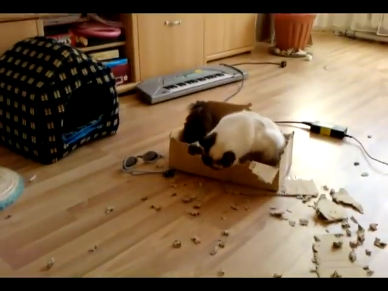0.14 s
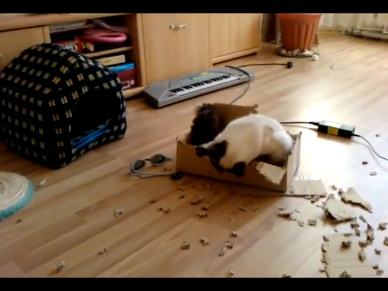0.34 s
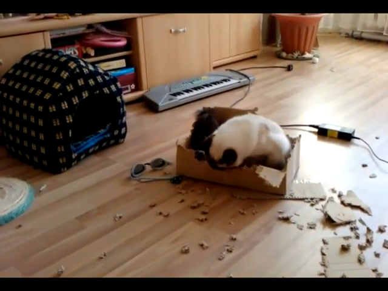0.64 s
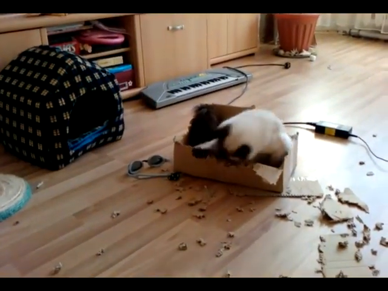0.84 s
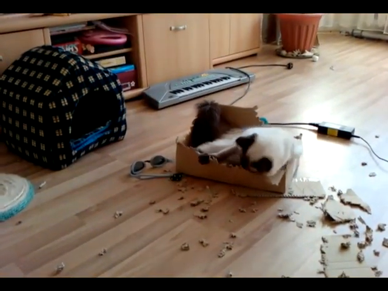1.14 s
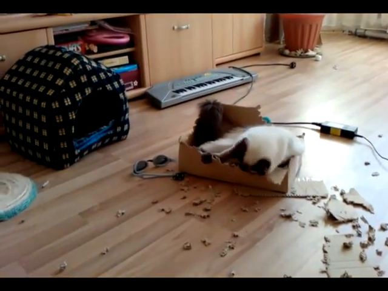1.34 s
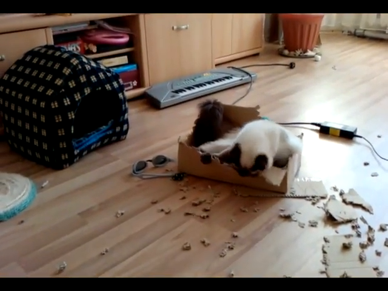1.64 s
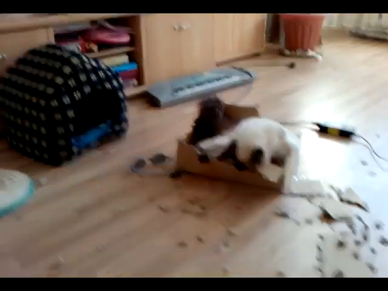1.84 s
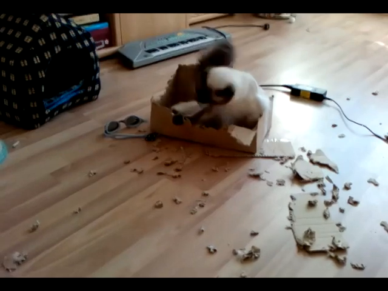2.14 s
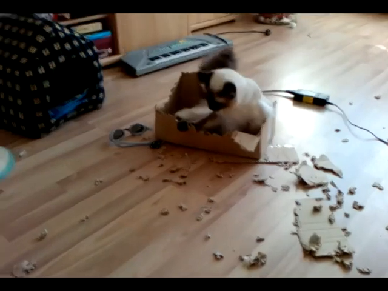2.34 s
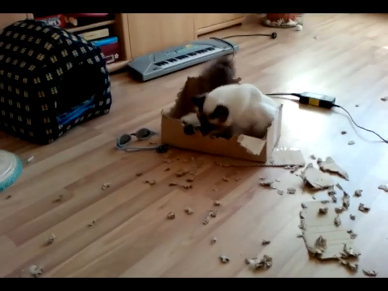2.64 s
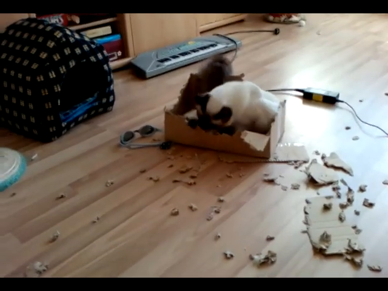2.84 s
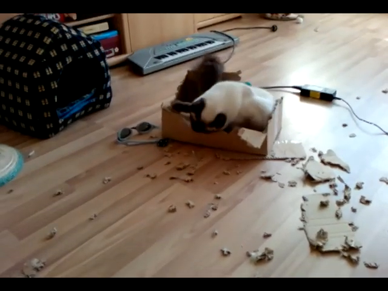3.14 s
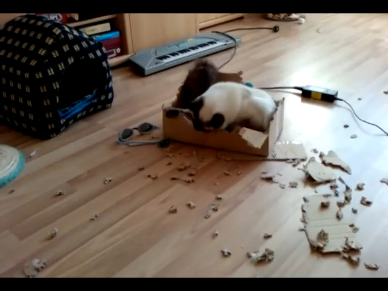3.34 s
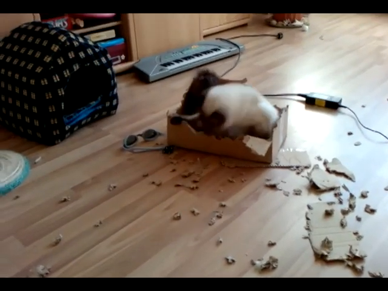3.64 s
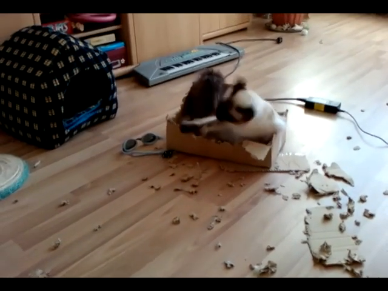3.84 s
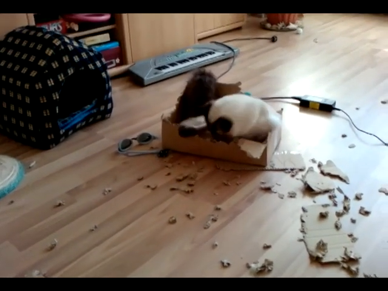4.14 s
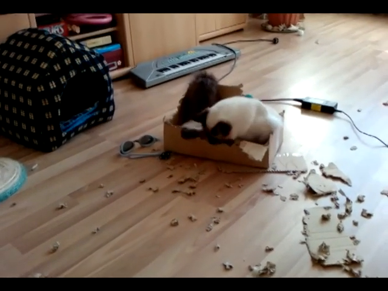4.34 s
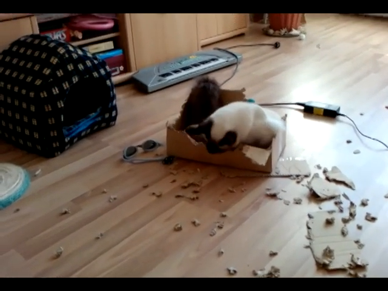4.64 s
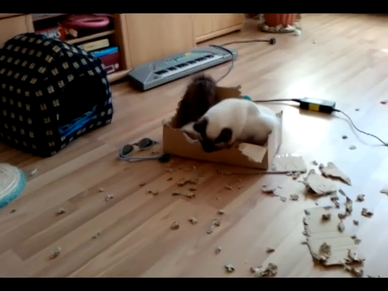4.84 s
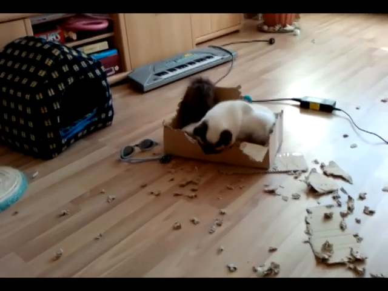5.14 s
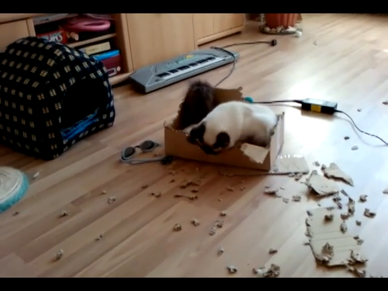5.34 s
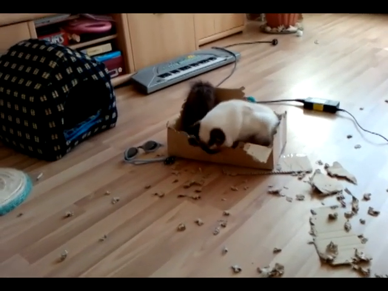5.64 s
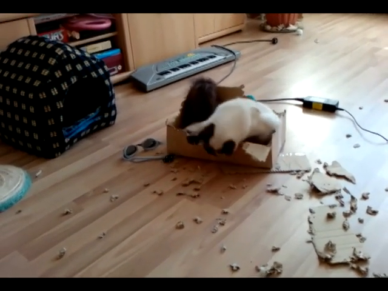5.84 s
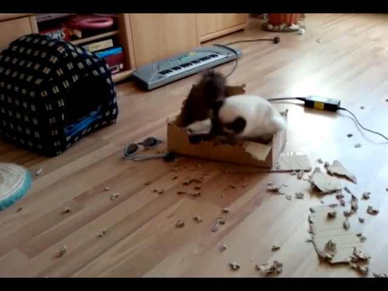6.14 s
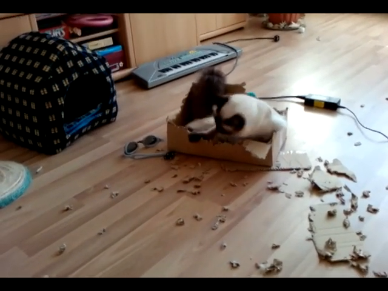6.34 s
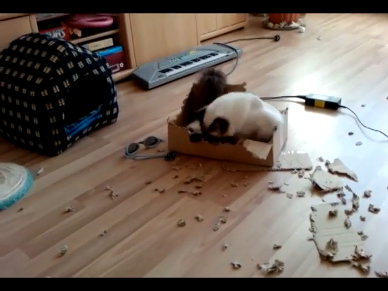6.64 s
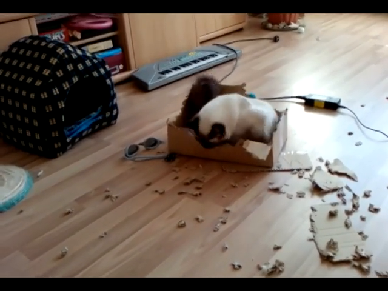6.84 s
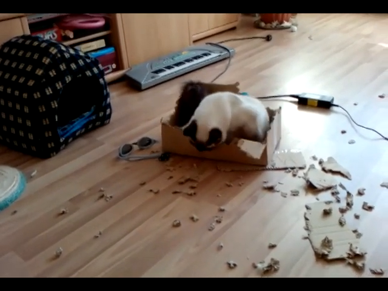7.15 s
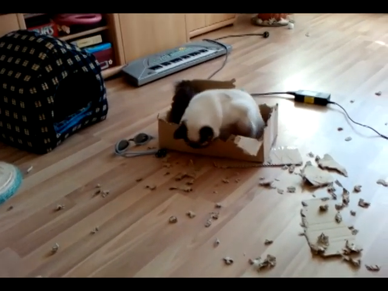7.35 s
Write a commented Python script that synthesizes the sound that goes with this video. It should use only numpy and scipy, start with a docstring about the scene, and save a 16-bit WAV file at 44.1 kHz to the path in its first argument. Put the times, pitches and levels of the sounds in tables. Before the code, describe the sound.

A cat gnaws and tears a cardboard box in a bare, echoing living room, with crisp rips, sharp snaps and hollow knocks in uneven bursts.

```python
"""A cat chews a cardboard box on a wooden floor, a couple of metres away in a bare, reverberant living room.
Over a faint hiss it gnaws, shifts a paw and tears small bits, until a hard snap and two knocks at 0.8 s.
Softer gnawing leads to a rip at 2 s, where the box drops and bounces; after a lull a piece snaps at 3.7 s.
Paws then slide and knock; rips and snaps crowd from 5.2 to 6.1 s, knocks follow, and a last bite ends it.
Breaking fibres are random pulses, walls and hollow are damped modes, and the room is decaying noise."""
import sys
import numpy as np
from scipy import signal
from scipy.fft import rfft, irfft, next_fast_len
from scipy.io import wavfile
from scipy.ndimage import map_coordinates

SR = 44100
rng = np.random.default_rng(int(sys.argv[2]) if len(sys.argv) > 2 else 0)


def dump_mix(stems):
    """Bounce the given channels to the path in sys.argv[1] as a 16-bit WAV at rate SR."""
    frames = np.atleast_2d(stems).T  # one column per channel
    limited = np.clip(frames, -1, 1)  # hard clip at full scale
    pcm = np.round(limited * 32767).astype(np.int16)
    wavfile.write(sys.argv[1], SR, pcm)


N = 329868
LEAD_S = 0.01  # room for the soft lead-in of a burst or rip


def amp(db):
    """Level: decibels become an amplitude ratio."""
    return 10 ** (np.asarray(db) / 20)


def unit(x):
    """Power normalisation: x scaled to rms 1."""
    return x / np.sqrt(np.mean(x ** 2) + 1e-20)


def normed(x):
    """Energy normalisation: x scaled to energy 1."""
    return x / np.sqrt(np.sum(x ** 2) + 1e-20)


def at_level(db, x, span=0.0032):
    """Equivalent energy: x carries as much as a sound that holds this level for span seconds."""
    return amp(db) * np.sqrt(span * SR) * normed(x)


def along(points, hz):
    """Logarithmic frequency: (Hz, value) points are joined on a log axis."""
    point_hz, value = np.transpose(points)
    return np.interp(np.log(hz + 1), np.log(point_hz + 1), value)


def add(track, s, sound):
    """Superposition: a sound is mixed into the track from time s on."""
    start = int(np.clip(round(s * SR), 0, N - 1))
    track[start:start + len(sound)] += sound[:N - start]


def wobble(rate, size):
    """Slow fluctuation: a smooth random curve with rate knots a second."""
    return map_coordinates(rng.standard_normal(1024), [np.arange(size) * rate / SR], mode="wrap")


def filtered(x, gain):
    """Linear filtering: the spectrum of x is multiplied by a gain that depends on frequency."""
    padded = next_fast_len(len(x) + 8192)
    spectrum = rfft(x, padded) * gain(np.fft.rfftfreq(padded, 1 / SR))
    return irfft(spectrum, padded)[:len(x)]


def through(x, response):
    """Convolution: x rings an impulse response."""
    return signal.fftconvolve(x, response)[:len(x)]


def click(colour, size=1024):
    """Minimum phase: the shortest causal pulse with this spectrum, energy 1."""
    cepstrum = irfft(np.log(amp(along(colour, np.fft.rfftfreq(size, 1 / SR)))))
    # folding the cepstrum onto positive times makes the pulse causal
    cepstrum[1:size // 2] *= 2
    cepstrum[size // 2 + 1:] = 0
    return normed(irfft(np.exp(rfft(cepstrum))))


def modes(table, size=4096):
    """Modal synthesis: damped resonances ring together; a small box radiates little deep bass."""
    t = np.arange(size) / SR
    ring = np.zeros(size)
    for k, (hz, width, db) in enumerate(table):
        decay = np.exp(-np.pi * width * t)
        # neighbouring modes have opposite signs; the width factor makes db the height of the peak
        ring += (-1) ** k * amp(db) * width * decay * np.sin(2 * np.pi * hz * t)
    bass_cut = signal.butter(2, 0.56 * table[0][0], "high", fs=SR)
    return normed(signal.lfilter(*bass_cut, ring))


# Modes of the box walls. Each row: frequency in Hz, width in Hz, relative peak height in dB.
WALL_MODES = [(544, 183, 0), (940, 84, 7.5), (1200, 205, 1), (2500, 1050, -27)]


def wall(hz, loss, others_db):
    """Coupled panels: one rings at its own pitch, its width a share of it, and shakes the other walls."""
    return modes([(hz, loss * hz, 0)]) + amp(others_db) * modes(WALL_MODES)


# Modes of the hollow box. Each row: frequency in Hz, width in Hz, relative peak height in dB.
HOLLOW_MODES = [(147.3, 60, -1), (256.7, 42, -0.91)]


def hollow():
    """Cavity resonance: the hollow box booms at its low modes."""
    return modes(HOLLOW_MODES)


# Reverberation of the bare room. Each row: frequency in Hz, time to decay by 60 dB in seconds.
ROOM_DECAY = [(100, 0.43), (400, 0.37), (900, 0.52), (3000, 0.48), (6000, 0.44), (12000, 0.43)]


def in_room(x, wet_db, build=0.0024):
    """Reverberation: direct sound plus a diffuse tail of decaying noise, drawn afresh for every sound."""
    hz, t, bands = signal.stft(rng.standard_normal(SR * 2 // 3), SR, nperseg=256)
    decay = 1000. ** (-t / along(ROOM_DECAY, hz)[:, None])
    tail = signal.istft(bands * decay, SR, nperseg=256)[1]
    tail *= 1 - np.exp(-(np.arange(len(tail)) / SR / build) ** 2)  # reflections take time to build up
    response = amp(wet_db) * normed(tail)
    response[0] += 1
    return signal.fftconvolve(x, response)


def fibres(size, rate, scatter_db):
    """Random point process: fibres break at random moments with very unequal force; rms 1."""
    breaks = rng.random(size) < rate / SR
    force = amp(scatter_db * np.clip(rng.standard_normal(size), -2, 2))
    return unit(breaks * force * rng.choice([-1, 1], size))


def burst(life, size=4096):
    """Impulsive noise: a burst with even spectrum swells briefly to LEAD_S, then dies away."""
    t = np.arange(size) / SR - LEAD_S
    envelope = np.exp(-np.abs(t) / np.where(t < 0, life / 2, life))
    noise = rng.standard_normal(size) * envelope
    return irfft(np.exp(1j * np.angle(rfft(noise))))  # keep the phases, even out the spectrum


# Every new grip of the teeth sets how the box answers snaps, rips and pulls until the next grip.
# Each row: start in seconds, wall pitch in Hz, wall over the break in dB, hollow over the break in dB
# (snaps and rips only), crispness of the paper as treble in dB.
TEETH_GRIPS = [(0, 576, 0, -27, 0), (0.78, 583, -1.5, -13, -2), (1.4, 514, 0.5, -7, -0.5),
               (1.65, 860, -2.5, -1, 5), (2.02, 458, -2.5, -8.5, -1), (2.4, 580, -1, -4, 3),
               (3.62, 522, -0.5, -14, -0.5), (3.673, 866, -0.5, -9, 0), (5.15, 844, 2, -10, 2.5),
               (5.55, 690, 1.5, -11.5, 2.5), (5.8, 610, 4.5, -9, 3), (5.99, 580, 0.5, -9.5, 0),
               (7.25, 920, 1.5, -5, 3)]


def grip(s):
    """Boundary conditions: wall pitch, wall share, hollow share and treble of the grip held at time s."""
    starts = [row[0] for row in TEETH_GRIPS]
    held = max(np.searchsorted(starts, s, "right") - 1, 0)
    return TEETH_GRIPS[held][1:]


CRISP_HZ = 4770  # crisp paper adds its treble above this


def crisp(x, treble_db):
    """Spectral tilt of fracture: some spots of the paper break with more treble than others."""
    return filtered(x, lambda hz: amp(treble_db * (1 - 1 / (1 + (hz / CRISP_HZ) ** 8))))


def flap(x, ripple_db, spacing_hz):
    """Local resonance: every torn flap of cardboard has random peaks and dips of its own."""
    knots = rng.standard_normal(256)

    def ripple(hz):
        return amp(ripple_db * map_coordinates(knots, [hz / spacing_hz], mode="wrap"))
    return filtered(x, ripple)


# Spectrum of the room background. Each row: frequency in Hz, relative level in dB.
QUIET_COLOUR = [(15, -16), (28, -5.5), (38, -1.5), (50, -9), (100, -12.5), (250, -17.5), (500, -24),
                (1000, -27), (3000, -32), (6500, -35.5), (10000, -44.5), (13000, -58.5), (16000, -72)]


def background():
    """Stationary noise: low rumble of the quiet flat under a soft, slightly restless hiss."""
    def noise(gain):
        return filtered(rng.standard_normal(N), gain)
    air = unit(noise(lambda hz: amp(along(QUIET_COLOUR, hz))))
    rumble = filtered(air, lambda hz: 1 / (1 + (hz / 250) ** 4))
    hiss = amp(0.78 * wobble(7.1, size=N)) * (air - rumble)
    drone = unit(noise(lambda hz: np.exp(-((hz - 37) / 5) ** 2)))
    return amp(-57.5) * (rumble + hiss) + amp(-67.5) * drone


# Modes of the box bottom on the floor. Each row: frequency in Hz, width in Hz, relative peak height in dB.
BOTTOM_MODES = [(78, 96, -14), (265, 24, -10), (407, 30, 3), (476, 54, -3.5)]
# The tugged box drops back on the floor and bounces. Each row: moment in seconds, level in dB.
BOX_DROPS = [(2.043, -19), (2.061, -22), (2.101, -26.5)]


def drops():
    """Impact excitation: the bottom of the box slaps the floor and booms."""
    out = np.zeros(N)
    for s, db in BOX_DROPS:
        add(out, s, in_room(at_level(db, modes(BOTTOM_MODES)), wet_db=-7.5))
    return out


SCUFF_RISE_S = 0.004  # time constant with which a paw starts sliding
# A paw slides over a wall. Each row: start in seconds, level in dB, wall pitch in Hz,
# fading length in seconds.
PAW_SCUFFS = [(0.155, -43, 560, 0.0063), (1.415, -49, 600, 0.0053), (1.459, -35.5, 870, 0.046),
              (3.043, -38.5, 920, 0.02), (4.05, -44.5, 840, 0.15), (4.846, -46.5, 870, 0.035),
              (5.039, -37, 650, 0.07), (6.701, -46, 780, 0.036), (6.915, -46, 820, 0.02)]


def scuffs(size=8192):
    """Stick-slip friction: many tiny slips, dulled by the fur, excite one broad wall resonance."""
    out, t = np.zeros(N), np.arange(size) / SR
    for s, db, hz, length in PAW_SCUFFS:
        slide = np.exp(-(t / length) ** 2) * (1 - np.exp(-t / SCUFF_RISE_S))
        slips = fibres(size, rate=2500, scatter_db=3.0) * slide
        soft = signal.lfilter(*signal.butter(2, 1300, fs=SR), slips)
        panel = through(soft, wall(hz, loss=0.45, others_db=-6))
        add(out, s, in_room(at_level(db, panel), wet_db=-4.5))
    return out


TAP_DB = -6.5  # tooth or claw in a knock, against the wall
# Spectrum of a soft tap. Each row: frequency in Hz, relative level in dB.
TAP_COLOUR = [(100, -14), (600, 21.5), (1250, -17.5), (1800, 2), (2450, 4.5), (3400, -2.5), (6200, -3),
              (8000, -14), (15000, -41)]
# Dull blows of paws and jaw on the box. Each row: moment in seconds, wall level in dB,
# hollow over the wall in dB, wall pitch in Hz.
BOX_KNOCKS = [(0.8313, -24, -11, 590), (0.8366, -27, -5.5, 590), (1.5645, -35, -12, 836),
              (1.77, -33, -15, 890), (2.5389, -53.5, -18, 1230), (2.995, -40.5, -22, 790),
              (3.068, -34.5, -9.5, 570), (4.5495, -45, -25, 830), (4.9617, -35, -4.5, 574),
              (5.0162, -43, -16, 377), (5.0781, -44.5, -16, 655), (6.5324, -52, 1, 536),
              (6.9457, -34.5, -2, 630), (6.9698, -47, -6, 574), (7.015, -37, -16, 1020),
              (7.08, -33, -4, 650), (7.1203, -27.5, -6, 615)]


def knocks():
    """Soft impact: a blow rings the walls and hollow of the box, with a small tap of tooth or claw."""
    out, tap = np.zeros(N), click(TAP_COLOUR)
    for s, db, hollow_db, hz in BOX_KNOCKS:
        panel = at_level(db, wall(hz, loss=0.16, others_db=-1.5))
        thud = panel + at_level(db + hollow_db, hollow())
        tick = at_level(db + TAP_DB, through(burst(life=0.0014), tap))
        add(out, s, in_room(thud, wet_db=-4.0))
        add(out, s - LEAD_S, in_room(tick, wet_db=0.5))
    return out


SLACK_DB, PULL_BEND = 14.5, 1.1  # drop one swell before or one fade after the peak; roundness of the top
PULL_WALL_DB = -1  # a slow pull shakes the wall less than a sudden break
PULL_SPREAD = 0.22  # octaves by which the wall pitch strays as the teeth shift from pull to pull
# Spectrum of fine breaking fibres. Each row: frequency in Hz, relative level in dB.
FIBRE_COLOUR = [(200, -15), (900, -16), (1600, 8.5), (2400, 7.5), (3600, 4), (4600, 5.5), (5700, 6),
                (6700, 2.5), (7900, -5), (10000, -9.5), (13000, -25.5), (16000, -36)]
# Slow pulls that tighten and slacken. Each row: hardest moment in seconds, crackle level there in dB,
# swell in seconds, fade in seconds.
SLOW_PULLS = [(0.008, -46.5, 0.0038, 0.0094), (0.095, -51, 0.041, 0.025), (0.27, -49, 0.24, 0.14),
              (0.508, -47, 0.19, 0.17), (1.26, -66.5, 0.06, 0.15), (1.48, -60, 0.034, 0.063),
              (1.7, -46, 0.0056, 0.024), (1.785, -47, 0.016, 0.11), (1.91, -46.5, 0.18, 0.19),
              (2.028, -35, 0.0076, 0.01), (2.865, -58.5, 0.042, 0.048), (2.917, -61, 0.01, 0.023),
              (3.095, -52, 0.056, 0.09), (3.235, -53.5, 0.04, 0.023), (3.28, -47.5, 0.012, 0.022),
              (3.335, -46.5, 0.035, 0.055), (3.47, -46.5, 0.037, 0.15), (3.655, -50.5, 0.056, 0.0053),
              (3.952, -52.5, 0.11, 0.061), (4.07, -64, 0.08, 0.21), (4.55, -58.5, 0.083, 0.091),
              (5.08, -57.5, 0.095, 0.052), (5.215, -49, 0.034, 0.05), (5.36, -54.5, 0.015, 0.044),
              (5.431, -44.5, 0.053, 0.094), (5.617, -46.5, 0.01, 0.034), (5.72, -56.5, 0.066, 0.053),
              (5.85, -55.5, 0.038, 0.027), (6.015, -47, 0.012, 0.045), (6.065, -38.5, 0.025, 0.019),
              (6.72, -60.5, 0.2, 0.069), (6.799, -53, 0.031, 0.14), (7.287, -40, 0.016, 0.021),
              (7.365, -51.5, 0.047, 0.039), (7.47, -42.5, 0.07, 0.1)]


def gnawing():
    """Stick-slip tearing: dense fibre breaks, in clumps as the teeth catch and slip, shake the walls."""
    out, fibre = np.zeros(N), click(FIBRE_COLOUR)
    clumps = amp(3.4 * wobble(140, size=N))
    breaks = unit(fibres(N, rate=1900, scatter_db=4.5) * clumps)
    for s, db, swell, fade in SLOW_PULLS:
        hz, wall_db, _, treble_db = grip(s)
        first = max(int((s - 2 * swell) * SR), 0)
        last = min(int((s + 2 * fade) * SR), N)
        span = np.arange(first, last)
        t = span / SR - s
        slackness = np.abs(t / np.where(t < 0, swell, fade)) ** PULL_BEND
        effort = amp(db - SLACK_DB * slackness)
        crackle = crisp(unit(through(breaks[span], fibre)), treble_db)
        pitch = hz * 2 ** (PULL_SPREAD * rng.standard_normal())
        panel = wall(pitch, loss=0.39, others_db=0.5)
        body = amp(wall_db + PULL_WALL_DB) * unit(through(breaks[span], panel))
        add(out, span[0] / SR, in_room(effort * (crackle + body), wet_db=-3.5))
    return out


# Spectrum of a sharp break. Each row: frequency in Hz, relative level in dB.
CRACK_COLOUR = [(100, -34.5), (500, -19.5), (1000, 0.5), (1600, -3), (2300, 1), (3300, -3), (4300, -3.5),
                (6000, -0.5), (7800, -12.5), (10000, -17), (13000, -31), (16000, -62)]


def crack_pulse():
    """Brittle fracture: the pulse of one sharp break, shared by rips and snaps."""
    return click(CRACK_COLOUR)


RIP_CATCH = 0.12  # share of its length that a tear needs to catch: long tears swell in
# Quick runs of breaking fibres. Each row: start in seconds, level in dB before crispness,
# length in seconds.
FIBRE_RIPS = [(0.262, -40, 0.023), (0.765, -41.5, 0.013), (0.821, -25.5, 0.0073), (1.011, -43.5, 0.022),
              (1.693, -37.5, 0.0065), (2.03, -20, 0.0094), (3.33, -35.5, 0.011), (3.668, -23, 0.0094),
              (3.942, -41, 0.015), (5.275, -32.5, 0.0067), (5.407, -36, 0.027), (5.596, -36.5, 0.011),
              (5.856, -31.5, 0.014), (6.064, -25, 0.016), (6.077, -29, 0.021), (7.269, -33, 0.0091)]


def rips(size=4096):
    """Crack propagation: a tear runs through many fibres within a hundredth of a second or so."""
    out, crack = np.zeros(N), crack_pulse()
    t = np.arange(size) / SR - LEAD_S
    for s, db, length in FIBRE_RIPS:
        hz, wall_db, hollow_db, treble_db = grip(s)
        run = fibres(size, rate=4500, scatter_db=3.0) / (1 + (2 * t / length - 1) ** 2)
        run *= 1 + np.tanh(t / (RIP_CATCH * length))  # the tear catches
        run *= signal.windows.tukey(size, .2)
        torn = flap(through(run, crack), ripple_db=2.5, spacing_hz=453)
        sharp = crisp(at_level(db, torn), treble_db)
        flex = at_level(db + wall_db, through(run, wall(hz, loss=0.12, others_db=-5.0)))
        boom = at_level(db + hollow_db, through(run, hollow()))
        add(out, s - LEAD_S, in_room(sharp + flex + boom, wet_db=-4.0))
    return out


# Single creases and flutes breaking. Each row: moment in seconds, level in dB before crispness.
FLUTE_SNAPS = [(0.385, -47), (0.6244, -50.5), (0.7923, -29.5), (0.8053, -17), (1.4242, -45.5),
               (1.5645, -52.5), (1.6635, -43), (1.77, -38.5), (1.812, -47), (1.8578, -42), (1.869, -46),
               (2.044, -24), (2.4776, -57), (3.1247, -46.5), (3.2047, -49), (3.2409, -40), (3.261, -46.5),
               (3.439, -41), (3.666, -24.5), (3.679, -27), (4.785, -50.5), (5.1906, -34.5), (5.233, -45.5),
               (5.277, -37), (5.82, -55), (5.868, -33), (6.074, -27.5), (7.3489, -41.5), (7.456, -39)]


def snaps():
    """Release of strain: a flute of the cardboard cracks and the freed wall flicks back."""
    out, crack = np.zeros(N), crack_pulse()
    for s, db in FLUTE_SNAPS:
        hz, wall_db, hollow_db, treble_db = grip(s)
        sharp = crisp(at_level(db, through(burst(life=0.0011), crack)), treble_db)
        flex = at_level(db + wall_db, wall(hz, loss=0.2, others_db=-11))
        boom = at_level(db + hollow_db, hollow())
        add(out, s - LEAD_S, in_room(sharp, wet_db=-2.0))
        add(out, s, in_room(flex + boom, wet_db=-2))
    return out


def scene():
    """Superposition: background, box, paws and teeth sum into one channel."""
    box_and_paws = drops() + scuffs() + knocks()
    tearing = gnawing() + rips() + snaps()
    return (background() + box_and_paws + tearing)[None]


TOP_HZ = 15800  # upper band limit


def record(dry):
    """Band limitation: nothing is kept from the band limit upwards."""
    return filtered(dry[0], lambda hz: hz < TOP_HZ)[None]


dry = scene()
out = record(dry)
dump_mix(out)
```